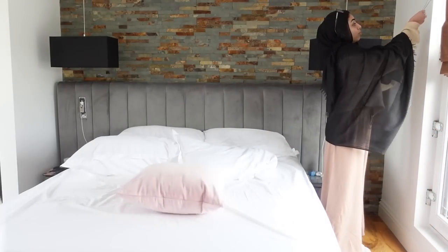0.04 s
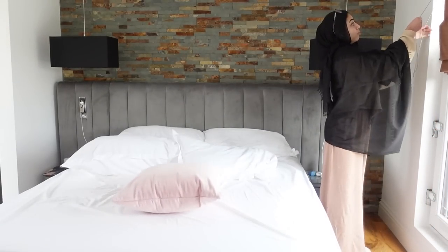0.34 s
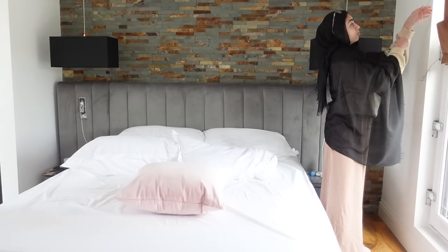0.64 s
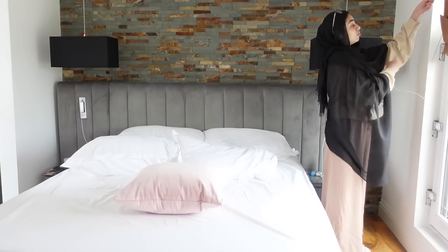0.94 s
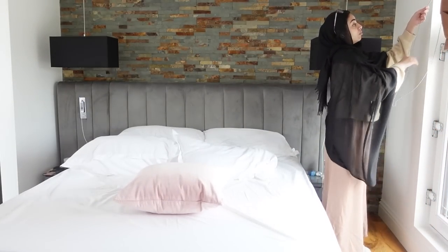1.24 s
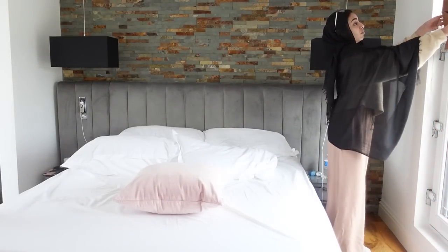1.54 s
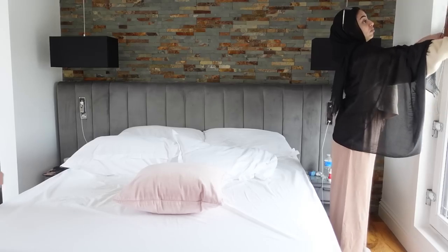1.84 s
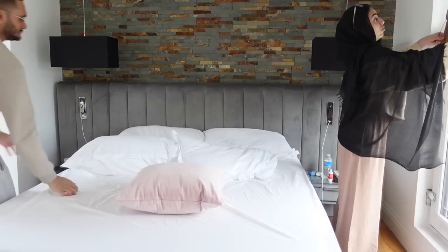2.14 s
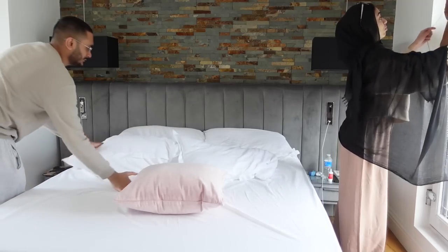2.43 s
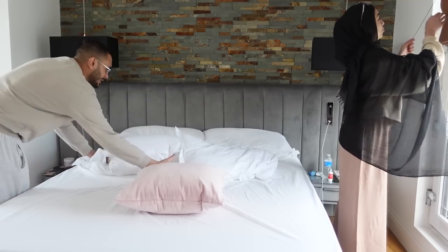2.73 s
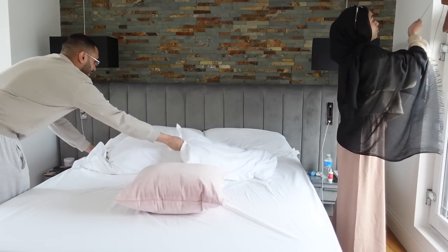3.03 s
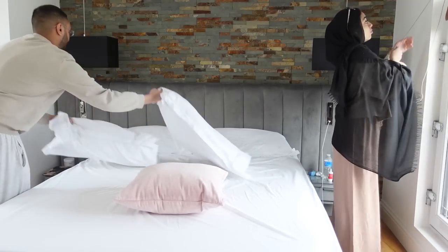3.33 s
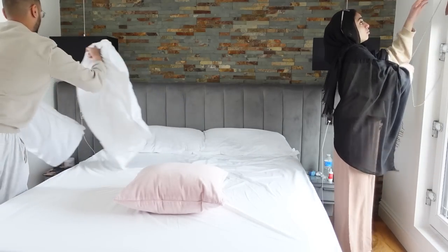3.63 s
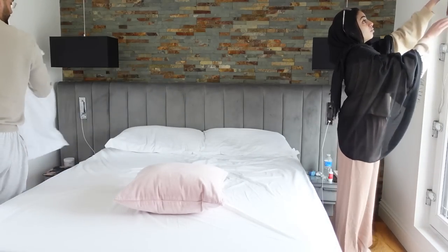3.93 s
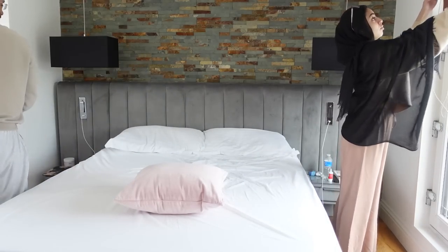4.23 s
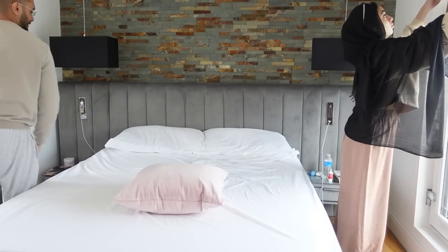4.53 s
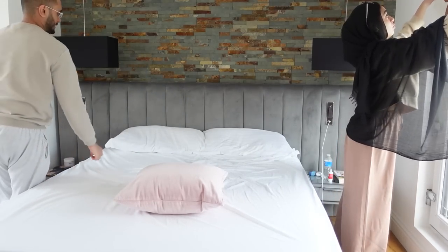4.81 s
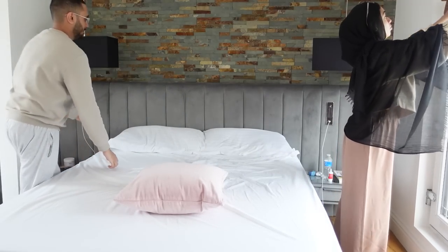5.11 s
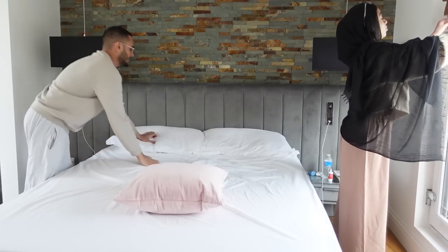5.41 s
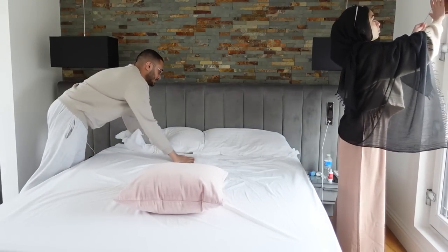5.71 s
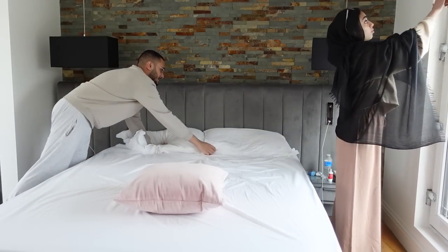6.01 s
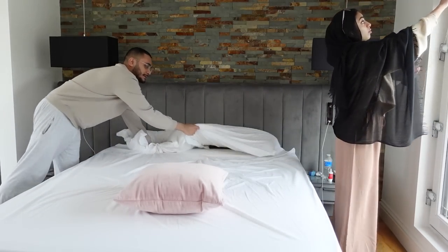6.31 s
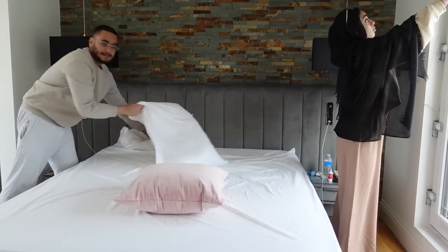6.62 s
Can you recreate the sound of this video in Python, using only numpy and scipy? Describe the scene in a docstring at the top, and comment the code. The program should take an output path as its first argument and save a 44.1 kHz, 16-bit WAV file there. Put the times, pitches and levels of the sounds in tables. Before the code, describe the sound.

Three bursts of fast, bright ticking from a roller blind's chain, with light chain slaps, rustling fabric and soft thumps between.

```python
"""A small bedroom, where a roller blind is raised in three pulls on its bead chain.
Each bead ticks through the clutch and rings the plastic housing and the roller tube. Between pulls
the slack chain slaps the frame, and at the end a small fitting on it clinks once.
Underneath, bedding and sleeves rustle, with a few soft thumps and a faint low tone."""
import sys
import numpy as np
from scipy import signal
from scipy.io import wavfile

SR = 44100
rng = np.random.default_rng(int(sys.argv[2]) if len(sys.argv) > 2 else 0)


def inscribe(sig):
    """Save sig as 16-bit PCM at rate SR to the path in sys.argv[1].

    A 1-D sig is mono; a 2-D sig holds one channel per row.
    Samples are clipped to [-1, 1] before scaling.
    """
    pcm = np.round(np.clip(np.atleast_2d(sig).T, -1, 1) * 32767)
    wavfile.write(sys.argv[1], SR, pcm.astype(np.int16))


N = 293706
TIME = np.arange(N) / SR

# bright EQ of beads on the clutch: (frequency [Hz], gain [dB])
TICK_EQ = [(300, -30), (800, -7.5), (1500, -2), (3100, -14), (3750, 0), (4600, -3), (5700, 1.5), (6800, 3),
           (8300, 2.5), (9500, 2.5), (11000, -1), (13500, -2), (15000, -5), (16000, -10.5)]
# dull EQ of rubbing fabric: (frequency [Hz], gain [dB])
RUB_EQ = [(25, -35), (60, -17), (120, -10), (230, -1), (400, 1.5), (700, -3), (1200, -9), (2200, -12.5),
          (4000, -18.5), (9000, -44.5)]


def chain_pulls(room, body_room, usual_speed=85, slack_db=-13, jitter_s=0.0001, slide_db=-8):
    """One hit per passing bead, over sliding chain and winding fabric; all grow with speed and force."""
    # chain speed, one curve per pull: (time [s], speed [beads/s])
    speed_curves = [
        [(.3435, 47.6), (.41, 53), (.44, 52.3), (.49, 50), (.58, 87), (.63, 103), (.77, 80), (.9, 78.4),
         (.97, 90.7), (1.09, 61), (1.215, 28)],
        [(2.6404, 36), (2.77, 108), (2.88, 115), (3.0, 104), (3.04, 68.5), (3.08, 58), (3.16, 101),
         (3.25, 112.4), (3.4, 82.3), (3.52, 80), (3.58, 48)],
        [(5.744, 21.8), (5.86, 45.7), (5.93, 80.4), (6.02, 88), (6.16, 78.7), (6.24, 64), (6.4, 51.5)],
    ]
    # the hand's effort per pull: (force [dB], growth [dB/s], taking up slack [s], easing off [s])
    efforts = [(-1.1, 1.2, 0.022, 0.04), (-2.23, 4, .03, .015), (-1.5, 4.5, 0.22, .33)]
    # how tick, housing, roller and fabric follow the hand:
    # (level at usual speed [dB], speed [dB/doubling], force [dB/dB], slack [dB/dB])
    responses = [(-25.5, 2, .5, 1.46), (-30.5, 4.5, 0.65, 0.84), (-32, 5, 1.73, 2), (-38.5, 3.5, 1.5, 0.2)]
    hits, levels = np.zeros((3, N)), np.zeros((4, N))
    for curve, (force_db, growth, grip_s, ease_s) in zip(speed_curves, efforts):
        times, speeds = np.transpose(curve)
        moving = (TIME >= times[0]) & (TIME <= times[-1])
        speed = np.interp(TIME, times, speeds)
        beads_passed = np.ceil(np.cumsum(speed * moving) / SR)
        at = np.flatnonzero(np.diff(beads_passed))
        timing, unevenness = rng.standard_normal((256, 2))[:len(at)].T
        held_s = TIME - times[0] + 1 / speeds[0]  # the hand grips one bead before the first hit
        force = force_db + growth * held_s
        tautness = np.clip(np.minimum(held_s / grip_s, (times[-1] - TIME) / ease_s), 0, 1)
        slack = slack_db * (1 - tautness)
        doublings = np.log2(speed / usual_speed)
        level = np.array([amp(db + by_speed * doublings + by_force * force + by_slack * slack)
                          for db, by_speed, by_force, by_slack in responses])
        level[1] *= amp(1.3 * drift(hz=14))  # the loose housing rattles unevenly
        strength = level[:3, at] / np.sqrt(speed[at]) * amp(-0.2 * unevenness)
        hits[:, at + (jitter_s * SR * timing).astype(int)] = strength
        levels += level * moving
    parts = clutch_mechanism(hits, room, body_room)
    rattle = sum(part * rms(level) / rms(part) for part, level in zip(parts, levels))
    slide = colour(levels[0] * grains(N, per_s=7000, spread_db=2.5), TICK_EQ)
    slide *= amp(slide_db) * rms(levels[0]) / rms(slide)
    fabric = colour(rng.standard_normal(N), RUB_EQ)
    return rattle + slide + levels[3] * fabric / rms(fabric)


def clutch_mechanism(hits, room, body_room, rebound_s=0.0043, tube_lag_s=0.002965):
    """Three trains of hits drive the clutch's tick, the housing's knock and the tube's low ring."""
    # resonances of each part: (frequency [Hz], bandwidth [Hz], gain [dB])
    clutch_modes = [(3725, 140, 2), (6910, 170, -2.5), (8170, 460, -0.5), (9870, 140, -1), (10000, 140, -1),
                    (11100, 140, 7), (12400, 69, -11), (13480, 59, -6)]
    housing_modes = [(1780, 55, 6), (1982, 62, 11), (2162, 220, 7.5), (2262, 230, 5.5), (2390, 21, 13.5)]
    wound_housing_modes = [(1750, 330, -12), (1800, 140, 11), (2040, 410, -2.5), (2230, 370, 7)]  # with most of the fabric wound on
    tube_modes = [(88, 25, -13.5), (169.8, 6.6, 0), (256, 6.7, -0.5), (321.3, 31, 6.5), (361.7, 10.4, 8),
                  (408.7, 23, 9.5), (494, 11, -3)]
    tick = snap(hits[0], t60=0.0026, rough=3.1)
    rebound = amp(-3) * delay(hits[1], rebound_s)  # a second knock as the bead seats
    knock = snap(hits[1] + rebound, t60=0.0061, rough=0.99)
    wound = TIME > 5  # for the last pull
    housing = ring(knock * ~wound, housing_modes) + ring(knock * wound, wound_housing_modes)
    bending = delay(hits[2], tube_lag_s)  # bending waves take a moment to run along the tube
    tube = ring(snap(bending, t60=0.025, rough=0.61), tube_modes)
    return [convolve(colour(tick, TICK_EQ) + ring(tick, clutch_modes), room),
            convolve(band(housing, 1170, "high"), body_room),
            band(band(tube, 89, "high"), 536, "low", order=4)]


def snap(hits, t60, rough, rise_s=0.00074):
    """Each impact is a clean transient plus a brief scrape that is never twice the same."""
    t = TIME[:2048]
    fade = amp(-60 * t / t60) * np.minimum(t / rise_s, 1)
    return hits + rough * convolve(hits, fade / np.linalg.norm(fade)) * rng.standard_normal(N)


def single_beads(room, body_room, tube_db=-3.5, energy_s=0.0034):
    """Lone beads slip through the clutch as the chain is taken up or let go."""
    # slips: (time [s], tick level [dB], housing knock level [dB])
    slips = [(0.2793, -26.5, -36.5), (0.3162, -19, -28.5), (1.2216, -19.5, -24.5), (2.021, -32, -40.5),
             (2.5127, -35, -34), (2.567, -27.5, -31.5), (3.7563, -31, -57)]
    times, tick_db, knock_db = np.transpose(slips)
    hits = np.zeros((3, N))
    hits[:, np.round(times * SR).astype(int)] = amp([tick_db, knock_db, knock_db + tube_db])
    parts = clutch_mechanism(hits, room, body_room)
    return sum(part * rms(hit) / rms(part) for part, hit in zip(parts, hits)) * np.sqrt(energy_s * SR)


def chain_slaps(room, ring_width_hz=480, trim_db=-1, contact_db=2, contact_s=0.011):
    """Many beads hit the frame almost together: a hard first contact, then a dense, dying clatter."""
    # slaps: (time [s], relative level [dB], attack [s], t60 [s], struck spot's ring [Hz], ring [dB])
    slaps = [(1.626, -23.5, 0.00099, 0.64, 3500, -18), (1.644, -22.5, 0.0087, 0.21, 3900, -12),
             (1.706, -21.5, 0.013, 0.084, 3900, -23), (1.774, -20, 0.0011, 0.038, 4100, 0),
             (2.58, -19, 0.0041, 0.079, 3860, 1), (2.608, -19, 0.0018, 0.067, 3950, -5),
             (3.603, -22, 0.016, .08, 3800, -20), (3.864, -27, 0.0037, 0.028, 5630, -14),
             (3.918, -19.5, 0.005, 0.3, 3740, -7), (4.013, -27.5, 0.0063, 0.043, 3500, -13),
             (4.41, -28.5, 0.0084, .049, 4200, -16), (4.557, -27, 0.0066, 0.088, 6350, -2),
             (4.619, -39.5, 0.0077, .072, 6400, -8), (4.677, -33.5, 0.0022, 0.18, 6300, 3),
             (4.761, -35.5, 0.038, 0.12, 3030, -5), (4.927, -21.5, 0.0062, 0.28, 3380, -14),
             (4.974, -20.5, .011, 0.056, 3460, -12), (6.4376, -20, 0.00061, 0.14, 4170, 4.5),
             (6.519, -25.5, 0.044, 0.12, 4500, -16)]
    # EQ of the clatter: (frequency [Hz], gain [dB])
    chain_eq = [(300, -16), (1000, 3), (2500, -4.5), (3800, 0.5), (7500, -2), (9300, 1), (11000, 1.5),
                (13500, 1), (16000, -3)]
    out, t = np.zeros(N), TIME[:SR // 2]
    contact = 1 + amp(contact_db) * np.exp(-t / contact_s) / 2
    for start, db, rise, t60, ring_hz, ring_db in slaps:
        clatter = colour(grains(len(t), per_s=6000, spread_db=1.0), chain_eq)
        clatter = band(clatter, 0.78 * ring_hz, "high")  # thin below the ring
        clatter += ring(clatter, [(ring_hz, ring_width_hz, ring_db)])
        add(out, start, amp(db) * envelope(t, rise, t60) * contact * clatter / rms(clatter))
    return amp(trim_db) * convolve(out, room) / np.linalg.norm(room)


def fitting_clink(start_s=6.411, level_db=-20):
    """A brief graze sets a small hard fitting on the chain ringing."""
    # resonances of the fitting: (frequency [Hz], bandwidth [Hz], gain [dB])
    fitting_modes = [(7500, 61, 5), (9100, 500, -8), (13100, 100, 3)]
    shape = amp(level_db) * envelope(TIME - start_s, rise_s=0.0082, t60=0.025)
    clink = ring(shape * rng.standard_normal(N), fitting_modes)
    return clink * rms(shape) / rms(clink)


def soft_thumps(rise_s=0.0082, band_ratio=1.6):
    """Padded bumps on the bed and floor, each a dull burst of band-passed noise."""
    # bumps: (time [s], level [dB], t60 [s], band centre [Hz])
    bumps = [(1.417, -30, 0.16, 334), (1.521, -25, 0.052, 253), (1.533, -33.5, 0.29, 56),
             (2.095, -37.5, 0.14, 145), (2.125, -45.5, 0.38, 47), (2.508, -36, 0.19, 330),
             (4.17, -43.5, .17, 1390), (4.22, -41.5, 0.13, 390), (4.272, -45, 0.27, 343),
             (5.651, -27, 0.4, 300), (5.682, -23, 0.19, 280), (6.563, -42, 0.37, 101)]
    # EQ of a bump ahead of its band-pass: (frequency [Hz], gain [dB])
    thud_eq = [(25, -49), (55, -15), (130, -4.5), (250, 4), (500, 3), (900, -1), (1800, 6), (3000, 5),
               (9000, -33)]
    out, t = np.zeros(N), TIME[:SR // 2]
    for start, db, t60, hz in bumps:
        shape = amp(db) * envelope(t, rise_s, t60)
        noise = colour(rng.standard_normal(len(t)), thud_eq)
        thud = shape * band(band(noise, hz * band_ratio, "low"), hz / band_ratio, "high", order=3)
        add(out, start, thud * rms(shape) / rms(thud))
    return out


def cloth_rustle(flutter_db=1.75):
    """Sleeves and bedding speed up and slow to rest: folds rub and flap, fibres catch in a fine swish."""
    # cloth moves: (start [s], speeding up [s], slowing down [s], low rub [dB], high swish [dB])
    moves = [(-.05, 0.13, 0.5, -40, -46.5), (1.1, 0.09, .25, -38.5, -48), (1.23, 0.11, 0.47, -30, -43),
             (1.48, 0.038, 0.21, -29, -44), (1.61, 0.054, 0.66, -44, -38), (1.83, 0.035, 0.16, -40.5, -55),
             (1.98, 0.056, 0.11, -50.5, -47.5), (2.231, 0.062, 3.4, -48.5, -47),
             (3.5, 0.078, 0.19, -40.5, -50), (3.73, 0.065, .12, -59, -48.5), (4.03, 0.23, .6, -57.5, -51),
             (4.34, 0.091, 0.45, -37.5, -43.5), (5.04, 0.093, .42, -78, -42),
             (5.41, 0.063, 0.99, -42.5, -42.5), (6.1, 0.25, 0.26, -40, -38), (6.5, 0.053, 0.32, -47, -36)]
    # rustle that remains between moves: (rub [dB], swish [dB])
    resting_db = (-66, -55.5)
    # airy EQ of catching fibres: (frequency [Hz], gain [dB])
    swish_eq = [(200, -14), (1200, -10), (2100, 2), (4000, 0.5), (6500, -1), (10000, -5.5), (16000, -11)]
    power = amp(resting_db)[:, None] ** 2
    for start, rise, fall, rub_db, swish_db in moves:
        speeding = np.clip((TIME - start) / rise, 0, 1)
        slowing = np.clip(1 - (TIME - start - rise) / fall, 0, 1) ** 2
        power = power + np.outer(amp([rub_db, swish_db]), speeding * slowing) ** 2
    rub_level, swish_level = np.sqrt(power)
    rub = colour(rng.standard_normal(N), RUB_EQ)
    swish = colour(grains(N, per_s=16000, spread_db=0.5), swish_eq)
    flutter = amp(flutter_db * drift(hz=59))
    return rub / rms(rub) * rub_level * flutter + swish / rms(swish) * swish_level


def low_tone(pitch_hz=261.4, sharp_hz=20.5, settle_s=0.053, sag_db_per_s=5, waver_db=4):
    """A faint, wavering sine before and after the second pull; each note starts sharp and settles."""
    # notes: (start [s], hold [s], level [dB])
    notes = [(2.261, 0.33, -45.5), (3.58, 0.13, -43)]
    out, t = np.zeros(N), TIME[:SR]
    hz = pitch_hz + sharp_hz * np.exp(-t / settle_s)
    for start, hold_s, db in notes:
        level = amp(db - sag_db_per_s * t) * envelope(t, rise_s=0.021, t60=0.39, hold_s=hold_s)
        add(out, start, np.sqrt(2) * level * np.sin(2 * np.pi * np.cumsum(hz) / SR))
    return out * amp(waver_db * drift(hz=25.74))


def bedroom(tail_db, echo_share, size=16384):
    """The room's impulse response: direct sound, early reflections and a short diffuse tail."""
    # reflections off the near walls and window: (delay [s], relative gain [linear])
    reflections = [(.0039, .25), (.0053, .2), (.0082, .5), (.0086, .36), (0.0089, .3), (0.0098, .28)]
    # reverb decay: (frequency [Hz], t60 [s])
    decay_times = [(100, 0.18), (500, 0.72), (2000, 0.35), (5000, 0.36), (10000, 0.25), (16000, 0.11)]
    hz, t, spectrum = signal.stft(rng.standard_normal(size), SR, nperseg=256)
    decay = amp(-60 * t / curve_at(decay_times, hz)[:, None])
    tail = signal.istft(spectrum * decay, SR, nperseg=256)[1]
    response = amp(tail_db) * band(tail / np.linalg.norm(tail), 450, "high")  # the bed soaks up the lows
    response[0] += 1
    for delay_s, gain in reflections:
        response[int(delay_s * SR)] += gain * echo_share
    return response


def amp(db):
    return 10 ** (np.asarray(db) / 20)


def rms(x):
    return np.sqrt(np.mean(x ** 2) + 1e-20)


def curve_at(points, hz):
    """Read a curve along a logarithmic frequency axis."""
    point_hz, values = np.transpose(points)
    return np.interp(np.log(hz + 1), np.log(point_hz + 1), values)


def add(mix, start_s, sound):
    part = mix[max(round(start_s * SR), 0):][:len(sound)]
    part += sound[:len(part)]


def delay(x, seconds):
    return np.concatenate([np.zeros(int(seconds * SR)), x])[:len(x)]


def envelope(t, rise_s, t60, hold_s=0):
    """Linear attack, optional hold, exponential release."""
    return np.clip(t / rise_s, 0, 1) * amp(-60 * np.maximum(t - rise_s - hold_s, 0) / t60)


def convolve(x, response):
    return signal.oaconvolve(x, response)[:len(x)]


def colour(x, eq, size=2048):
    """Minimum-phase EQ through (Hz, dB) points."""
    log_gain = np.log(amp(curve_at(eq, abs(np.fft.fftfreq(size, 1 / SR)))))
    spectrum = np.exp(np.conj(signal.hilbert(log_gain)))
    return convolve(x, np.fft.ifft(spectrum).real)


def band(x, hz, kind, order=2):
    """Pass the "low" or the "high" band."""
    return signal.sosfilt(signal.butter(order, hz, kind, fs=SR, output="sos"), x)


def ring(x, modes, size=4096):
    """Damped resonances, each with its own peak gain."""
    t = np.arange(size) / SR
    tones = [amp(db) * 2 * np.pi * width / SR * np.exp(-np.pi * width * t) * np.cos(2 * np.pi * hz * t)
             for hz, width, db in modes]
    return convolve(x, sum(tones))


def drift(hz):
    """Random modulation of about unit size, gliding to hz new values a second."""
    knots = rng.standard_normal(int(TIME[-1] * hz) + 2)
    return np.interp(TIME * hz, np.arange(len(knots)), knots)


def grains(n, per_s, spread_db):
    """A texture of tiny impacts of uneven size."""
    impacts = rng.standard_normal(n) * (rng.random(n) < per_s / SR)
    impacts *= amp(spread_db * rng.standard_normal(n))
    return impacts / rms(impacts)


def scene():
    """The stereo mix, with the treble leaning left and a little diffuse sound at the sides."""
    # stereo balance: (frequency [Hz], left minus right [dB])
    balance = [(450, 0.5), (1000, 0.5), (2000, 0.8), (4000, 1.5), (8000, 2), (14000, 4.5)]
    # stereo width: (frequency [Hz], side gain [dB])
    side_eq = [(340, -61.5), (560, -16), (1000, -11), (2000, -14), (5000, -18.5), (14000, -27)]
    room, body_room = bedroom(tail_db=2, echo_share=0.5), bedroom(tail_db=-2, echo_share=0.18)
    blind = chain_pulls(room, body_room) + single_beads(room, body_room)
    blind += chain_slaps(bedroom(tail_db=-1, echo_share=0.7))
    mid = blind + fitting_clink() + soft_thumps() + cloth_rustle() + low_tone()
    size = SR // 8
    scatter = rng.standard_normal(size) * signal.windows.hann(size) * amp(-60 * TIME[:size] / 0.046)
    side = colour(convolve(mid, scatter / np.linalg.norm(scatter)), side_eq)
    return np.array([colour(mid, [(hz, sign * db / 2) for hz, db in balance]) + sign * side
                     for sign in (1, -1)])


def record(dry):
    """A steep low-pass takes off the air above about 16 kHz."""
    low_pass = signal.firwin(511, 15950, window=("kaiser", 9), fs=SR)
    return signal.oaconvolve(dry, low_pass[None], "same")


dry = scene()
out = record(dry)
inscribe(out)
```